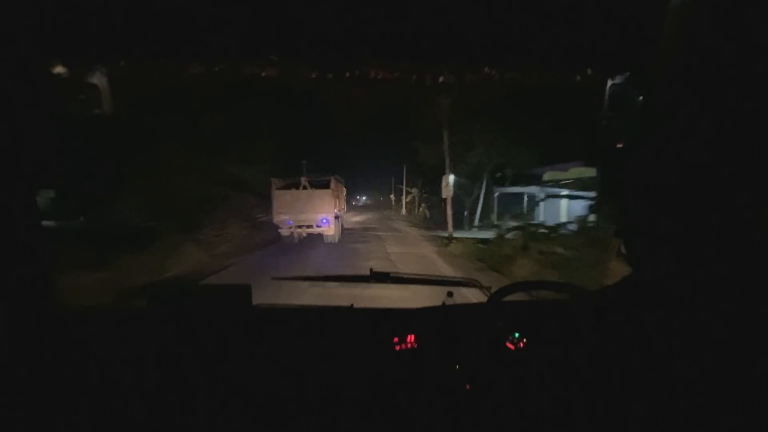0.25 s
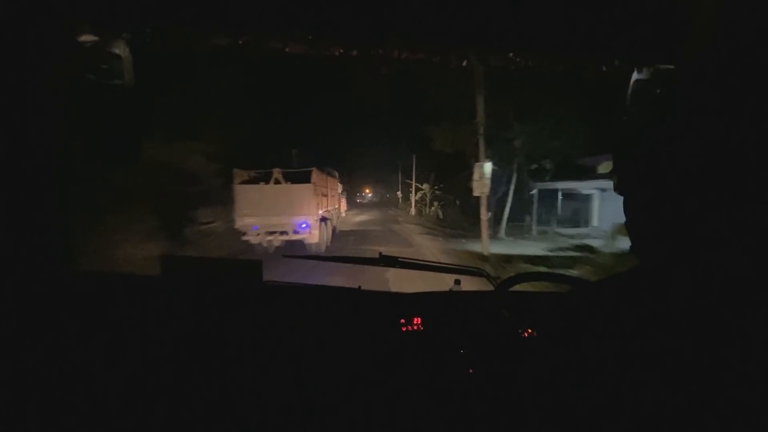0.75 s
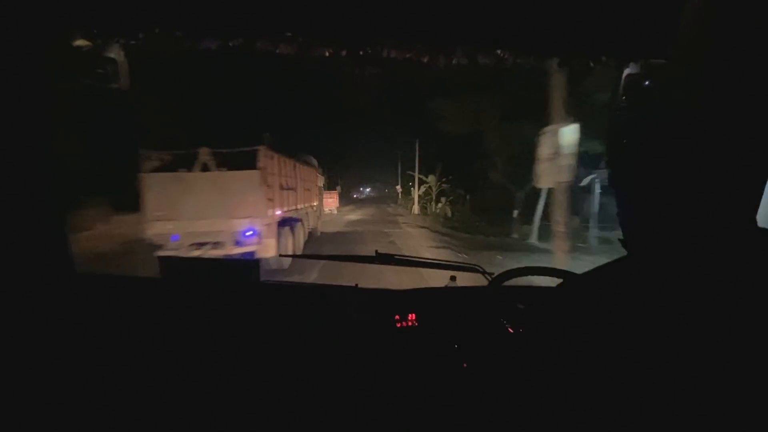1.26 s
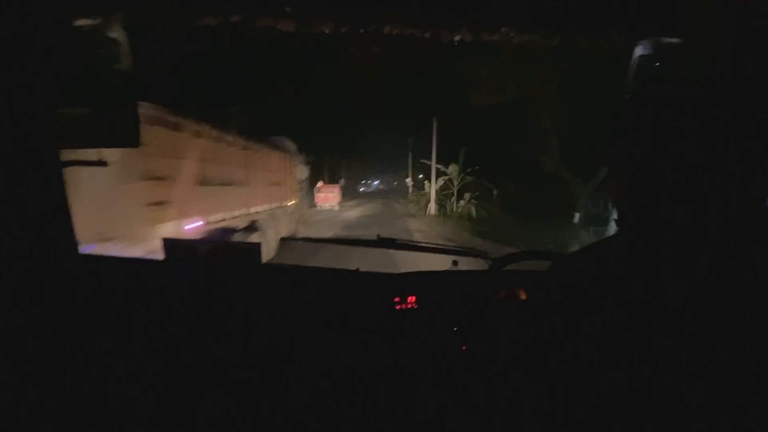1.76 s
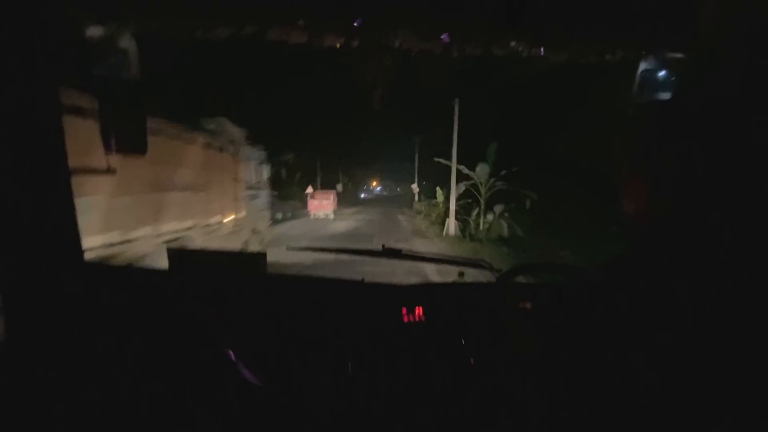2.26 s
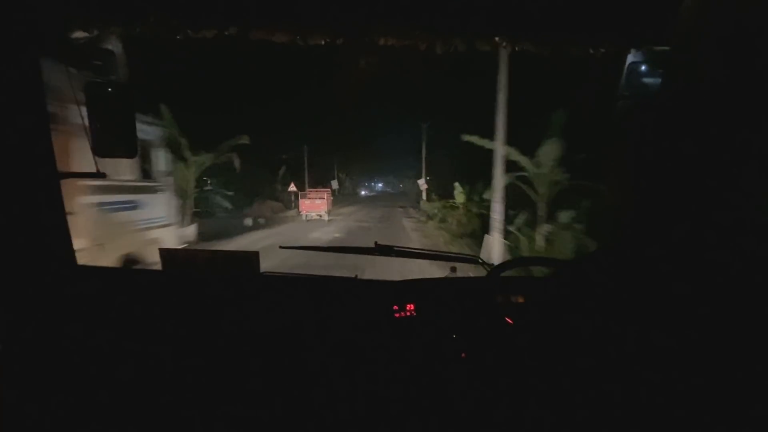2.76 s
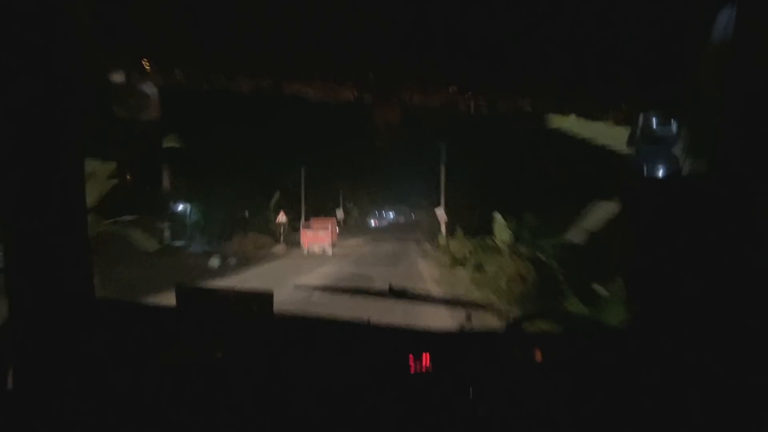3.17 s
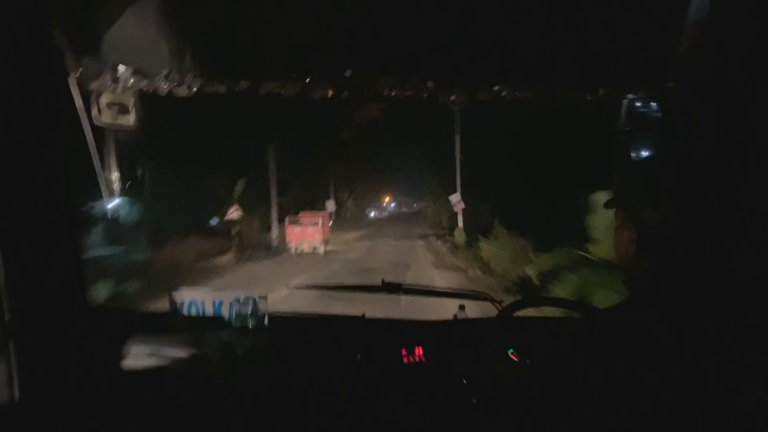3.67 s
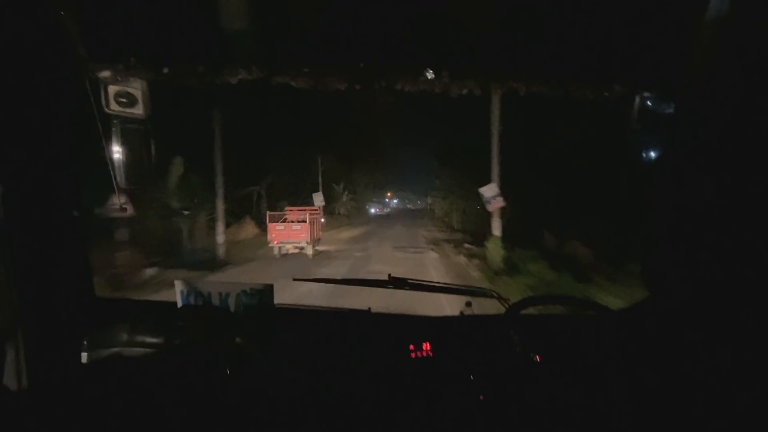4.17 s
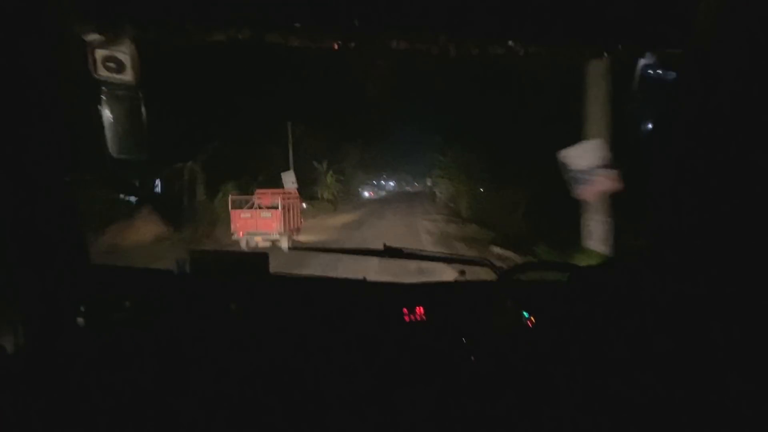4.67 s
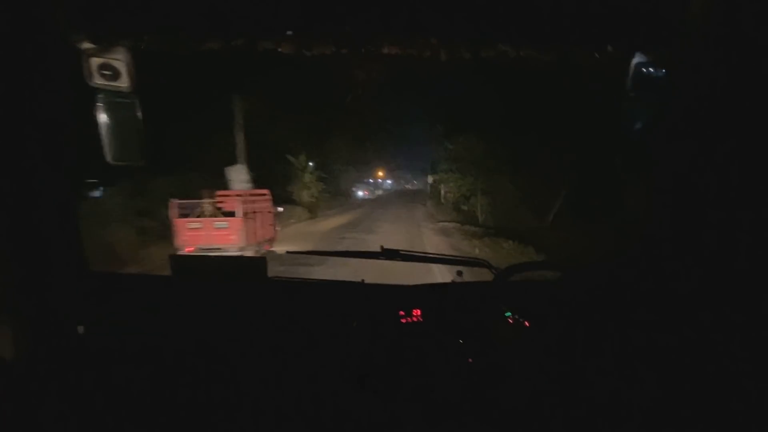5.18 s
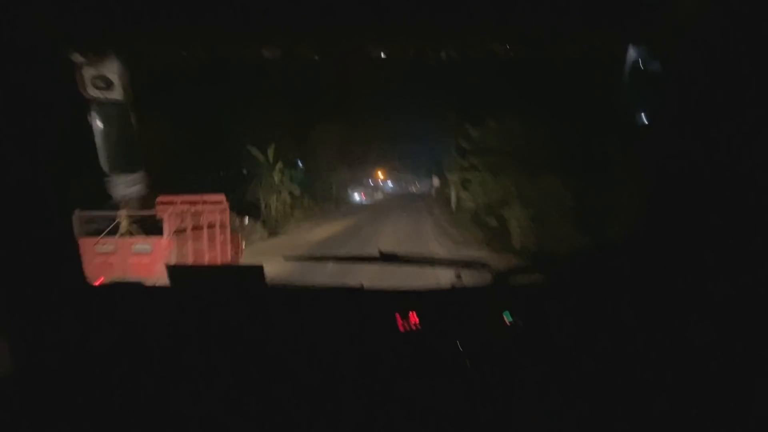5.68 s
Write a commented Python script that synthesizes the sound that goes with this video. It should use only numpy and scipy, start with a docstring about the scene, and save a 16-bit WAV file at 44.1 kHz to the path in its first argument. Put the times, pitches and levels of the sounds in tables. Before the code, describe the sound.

Interior of a bus overtaking a truck on a night road, picked up in stereo behind the windscreen. A loud, brassy air horn is sounding at the start: two trumpets, roughly 330 and 430 Hz, with bright harmonics and hissing air. It breaks off at about 0.12 s, spits back at 0.2 s with a raspy restart, and holds until about 0.87 s, its tone beating and shifting, slightly duller after 0.6 s, then ringing off quickly. A bump booms near 0.95 s, with light pane judders to 1.5 s over a quieter low rumble. From 1.5 s the road roughens: floor rumble and panel boom swell, with tyre roar, grit and fluttering trim clatter. Strong jolts and glass judder come around 2.4-2.6, 3.9-4.1, 4.8-4.9 and 5.3-5.5 s, with a heavy low bump at 4.5 s. Loose fittings knock throughout; tiny high squeaks and brief squeals appear. Rough running continues to the end.

```python
"""Air horn and rough road inside a bus

A bus overtakes a truck. Its two-trumpet air horn, two harmonic stacks over hissing air, sounds, breaks for an
instant and sounds on; the partials change level as the truck comes closer.
On rough road shaped noise gives the rumble, boom, roar and clatter; enveloped noise bursts give the knocks, thuds,
grit and juddering pane; decaying sines ring at the bumps, and unsteady sines squeak and squeal."""
import sys
import numpy as np
from scipy import signal
from scipy.fft import rfft, irfft, next_fast_len
from scipy.io import wavfile
from scipy.ndimage import uniform_filter1d

SR = 44100
rng = np.random.default_rng(int(sys.argv[2]) if len(sys.argv) > 2 else 0)


def unload_wav(signal):
    """Save mono or channel-first audio to the path in sys.argv[1] as 16-bit WAV at rate SR, clipped to [-1, 1]."""
    wavfile.write(
        sys.argv[1],
        SR,
        np.round(np.clip(np.atleast_2d(signal).T, -1, 1) * 32767).astype(np.int16),
    )


N = 261513
T = np.arange(N) / SR
EDGE_HZ = 12300  # upper band limit

# Horn valve: opening t/s, shutting t/s
VALVE = [(-.02, .118), (.199, .866)]
LOW_HZ, HIGH_HZ = 332.3, 430.2  # settled fundamentals of the trumpets
# First partials of each trumpet, fundamental first, with the beating of a Doppler-shifted echo off the truck:
# far relative level/dB, near relative level/dB, turn t/s, echo share, beat f/Hz at t = 0, beat drift/(Hz/s),
# left crest t/s, right crest t/s, left minus right level/dB
LOW_PARTIALS = [(-31.7, -25.3, 0.53, 0.47, 4.8, -5.4, 0.43, 0.41, 1.0),
                (-27.5, -30.6, 0.34, 0.34, 5.7, -6.0, 0.27, 0.21, 1.0),
                (-22.2, -31.0, 0.39, 0.65, 0.8, 4.3, 0.42, 0.41, 0.0),
                (-32.0, -27.4, 0.38, 0.23, 5.4, -0.4, 0.39, 0.41, -3.0),
                (-30.0, -34.1, 0.52, 0.32, 7.3, 0.8, 0.53, 0.53, -2.0),
                (-30.1, -41.5, 0.45, 0.8, 1.5, -1.4, 0.71, 0.75, -1.0),
                (-36.5, -40.8, 0.54, 0.44, 2.4, -2.7, 0.52, 0.4, 3.0),
                (-29.6, -37.0, 0.25, 0.63, 0.8, 0.7, 0.61, 0.58, 3.0)]
HIGH_PARTIALS = [(-33, -28.5, 0.46, 0.2, 3.1, -1.3, 0.12, 0.17, 1.0),
                 (-18.7, -26.9, 0.44, 0.23, 4.0, 5.8, 0.44, 0.36, 8.0),
                 (-32.1, -25.0, 0.36, 0.38, 3.0, 3.2, 0.1, 0.06, 2.0),
                 (-25.3, -32.3, 0.47, 0.55, 1.2, 1.8, 0.44, 0.46, 0.0),
                 (-35.5, -27.5, 0.475, 0.45, 2.2, -0.5, 0.62, 0.62, -4),
                 (-33.0, -39.7, 0.56, 0.52, 3.4, 3.5, 0.49, 0.53, -1.0),
                 (-34.5, -42, 0.41, 0.55, 2.3, -2.2, 0.5, 0.55, 0),
                 (-38, -42, 0.43, 0.36, 6.3, -2.0, 0.68, 0.63, 1.0),
                 (-45, -39.5, 0.27, 0.41, 2.2, 0.1, 0.19, 0.04, 4.0),
                 (-47.8, -44.8, 0.44, 0.47, 7.9, -4.6, 0.35, 0.28, 5.0)]
# Brassy partials above those: f/Hz, relative level/dB of each
LOW_BRASS = [(2990, -43.5), (3300, -46.5), (4300, -45), (5000, -46.5), (6200, -61), (7500, -53),
             (9000, -59), (12300, -62)]
HIGH_BRASS = [(4700, -49), (5300, -48.5), (6200, -42), (7500, -51.5), (9000, -54), (12300, -63)]
# Phase by which the left microphone leads in the horn: f/Hz, phase/rad
HORN_LEAD = [(332, 1.2), (430, 1.8), (665, -2.15), (860, .8), (997, 2.15), (1291, -1.5), (1329, .7),
             (1662, -1.9), (1721, 1.3), (1994, -1.4), (2151, .8), (2326, -1.9), (2581, -.9), (2658, 2),
             (3011, -1.3), (3442, -1.2), (3872, .1), (4302, 1.4)]
# Ringing of the horn after the valve shuts: f/Hz, t60/s
HORN_RING = [(330, .42), (430, .45), (665, .24), (860, .16), (1300, .18), (2200, .17), (3500, .14),
             (12000, .11)]
# Spectrum of air hissing through the horn: f/Hz, relative density level/dB
HORN_AIR = [(200, -11), (430, -24), (580, -13), (900, 8), (2000, 11), (3200, 6), (6000, 0), (7800, -16),
            (9000, -17), (12000, -20)]
# Reflections from passing poles and trees: f/Hz, share of the direct sound
ROADSIDE_ECHO = [(900, .08), (2200, .17), (3000, .5), (5000, .7)]
ROADSIDE_DOPPLER = .004  # spread of the relative frequency shift
TRUCK_ECHO, TRUCK_DOPPLER = .8, .0009  # for the brassy top: share of the direct sound, spread of relative shift
WAVER_SHARE, WAVER_SPREAD = .16, .016  # quick waver of each partial: share of its level, relative spread
TURN_S = 0.035  # time constant of a partial's turn from far to near level
DULL_AT_S, DULL_OVER_S, DULL_DB = 0.59, 0.019, 3  # the brassy top dulls
SURGE_DB, SURGE_S = 2.5, 0.043  # each blast starts strong, then the air pressure settles
REED_JITTER = .0014  # relative rms unsteadiness of the pitch
PUFF_DB, PUFF_S = 5, 0.03  # air spits out as the valve opens, before the reeds lock in
TONE_DB = .7  # gain of the two trumpets together
CABIN_WET_DB = -16  # gain of the cabin's tail under the horn

# Spectra of floor rumble, panel boom, roar and clatter: f/Hz, relative density level/dB
RUMBLE = [(12, -29), (25, 4), (31, 8), (42, 13.5), (52, 18), (59, 24), (73, 16), (90, 20), (115, 5),
          (170, -59)]
BOOM = [(70, -72), (118, 0), (148, -8), (164, -4), (177, 1.5), (193, -5.5), (216, -3), (245, -11.5),
        (300, -12), (400, -18.5), (600, -25), (1200, -120)]
ROAR = [(150, -0.5), (330, 4), (500, -1.5), (800, -2.5), (1200, -9.5), (1700, -15), (2400, -22),
        (3400, -22), (5000, -24), (9000, -74)]
CLATTER = [(900, -13), (2400, 12.5), (4000, 0.5), (6500, 6), (8500, 2), (9600, -2), (11000, -0.5),
           (12400, -15)]
# Steady running on smooth, then rough road: t/s, floor rumble relative level/dB, roar relative level/dB
ROAD = [(0, -28, -35.5), (1.1, -35, -54), (1.39, -31.5, -55), (1.47, -22.5, -44), (1.8, -24.5, -44.5),
        (2.15, -22.5, -38.5), (3.0, -21.5, -44), (4.5, -19, -40), (5.13, -18.5, -44), (5.93, -16, -39)]
# Boom of the body panels: t/s, level/dB before the brief changes
BOOM_LEVEL = [(0, -35.5), (.55, -39.5), (.9, -39.5), (1.0, -30), (1.38, -35), (1.5, -23.5), (1.68, -28),
              (1.88, -20), (2.5, -23.5), (2.8, -21.5), (3.04, -29), (3.12, -24.5), (3.6, -20.5), (3.8, -26),
              (4.4, -21), (5.2, -22.5), (5.52, -19), (5.93, -22.5)]
# Brief changes of level, up or down: middle t/s, floor change/dB, panel boom change/dB
BRIEF_CHANGES = [(1.68, 3.5, -4.5), (2.52, 2.5, -4), (2.66, -3, -4.5), (3.04, -4.5, -3.5), (3.25, 1.5, -4),
                 (3.74, -3.5, -2.5), (4.33, -10, 3), (4.58, -2, -6.5), (5.77, -5.5, -1)]
CHANGE_S = 0.034  # half the 1/e length of a brief change
# Floor heaves as the wheels cross broken tarmac: middle t/s, 1/e length/s, relative level/dB
HEAVES = [(0.27, 0.06, -22), (1.5, 0.15, -22.5), (1.933, 0.033, -15), (2.16, 0.053, -16.5),
          (2.35, 0.058, -14), (2.448, 0.14, -17), (2.616, 0.036, -12), (3.143, 0.022, -13.5),
          (3.21, 0.034, -11), (3.58, 0.08, -17.5), (3.81, 0.054, -15), (3.886, 0.052, -14),
          (4.096, 0.31, -19.5), (4.541, 0.04, -15), (4.631, 0.034, -17), (4.815, 0.14, -16),
          (5.007, 0.066, -19), (5.23, 0.12, -15.5), (5.376, 0.043, -13.5), (5.508, 0.042, -12.5),
          (5.568, 0.053, -18), (5.675, 0.026, -22), (5.857, 0.069, -24)]
HEAVE_EDGE = 4  # steepness of a heave's flanks
# Rough stretches that shake the bus: t/s, length/s, roar relative level/dB, clatter relative level/dB
STRETCHES = [(0.84, 0.024, -34.5, -55), (1.435, 0.13, -42, -57), (1.836, 0.17, -37, -53),
             (2.341, 0.23, -34, -50.5), (2.431, 0.032, -26.5, -47), (2.682, 0.15, -39.5, -53.5),
             (3.035, 0.19, -39, -53), (3.295, 0.21, -36, -50.5), (3.763, 0.44, -35.5, -52.5),
             (3.855, 0.095, -30, -48), (4.267, 0.12, -34, -48), (4.642, 0.17, -38, -55),
             (4.772, 0.16, -30.5, -47.5), (5.158, 0.18, -33.5, -54), (5.28, 0.37, -32.5, -50),
             (5.788, 0.077, -32, -45.5)]
SHAKE_RISE_S, SHAKE_T60 = 0.052, 0.56  # shaking builds on a stretch and dies away after it
# in steady running the trim clatters under the roar and grows faster than it
CLATTER_UNDER_DB, CLATTER_GROWTH, ROAR_NORMAL_DB = -19, 1.13, -46
# Wheels hit bumps and a panel rings: t/s, relative level/dB, ring f/Hz, t60/s
BUMPS = [(0.948, -6, 171.5, 0.1), (4.473, -2, 162.4, 0.12), (5.496, -8.5, 147, 0.14),
         (5.6, -9.5, 179.7, 0.44)]
BUMP_SIDE_DB = 2  # left minus right
# Jolts through the bodywork: t/s, relative level/dB, t60/s
THUDS = [(1.49, -37, 0.17), (2.31, -28, 0.35), (2.458, -17, 0.11), (2.555, -22, 0.09), (3.11, -23, .15),
         (3.29, -27.5, 0.43), (3.57, -22, 0.12), (3.89, -21, 0.13), (4.01, -18, 0.16), (4.105, -22, 0.22),
         (4.325, -24, 0.36), (4.74, -31, .3), (4.91, -29, 0.17), (5.177, -29, 0.13), (5.38, -22, 0.21),
         (5.78, -21.5, 0.29)]
# Spectrum of the thuds: f/Hz, relative density level/dB
THUD_COLOUR = [(100, -25), (220, 7), (330, 11.5), (500, 4.5), (800, -26), (1300, -12), (3000, -43)]
# Spectrum of grit thrown up by the tyres: f/Hz, relative density level/dB
GRIT = [(250, 3.5), (480, 0), (640, 2.5), (850, 1), (1300, -6.5), (2500, -15.5), (5000, -32)]
# Knocks of loose fittings: t/s, relative level/dB, t60/s
RATTLES = [(1.0171, -46, 0.073), (2.1794, -37, 0.11), (2.2184, -32, 0.11), (2.3206, -40, 0.08),
           (2.373, -23.5, 0.11), (2.4294, -28, 0.11), (2.6534, -31, 0.097), (2.8938, -39, 0.33),
           (3.05, -34, 0.056), (3.1682, -25, 0.066), (3.2116, -33.5, 0.12), (3.2896, -31.5, 0.091),
           (3.4411, -45, 0.1), (3.597, -34.5, 0.16), (3.6381, -38.5, 0.46), (3.7864, -34, 0.16),
           (3.8372, -27, 0.068), (3.8864, -30.5, 0.14), (4.1091, -34, 0.073), (4.1869, -35, 0.13),
           (4.2817, -35, 0.069), (4.363, -23, 0.033), (4.6009, -33.5, 0.17), (4.6245, -25.5, 0.07),
           (4.6753, -35, 0.23), (4.791, -29, 0.073), (4.9244, -26.5, 0.08), (5.2969, -33.5, 0.2),
           (5.5732, -30, 0.076), (5.6979, -29.5, 0.12), (5.768, -29, 0.19)]
# Spectrum of knocks and ticks: f/Hz, relative density level/dB
RATTLE_COLOUR = [(300, -19), (1200, 3), (2600, 7.5), (5000, 9), (7500, 9.5), (9500, 6.5), (11000, 7.5),
                 (12400, 3.5)]
# Judders of a window pane in its frame: t/s, relative level/dB
JUDDERS = [(1.035, -40), (1.128, -36), (1.199, -33.5), (1.395, -31), (1.49, -30), (2.449, -15),
           (2.503, -17.5), (2.556, -24), (2.597, -20), (3.226, -23.5), (3.568, -32), (3.893, -15.5),
           (3.944, -23.5), (3.985, -34), (4.012, -27), (4.118, -19.5), (4.341, -21), (4.856, -15),
           (4.923, -18.5), (5.177, -21), (5.317, -14), (5.375, -10.5), (5.43, -30), (5.465, -25.5),
           (5.51, -19), (5.618, -15)]
# Resonances of the pane: f/Hz, width/Hz, relative level/dB
PANE = [(720, 84, 12), (1026, 8, 22.5), (1490, 120, -22), (1940, 65, 1), (2500, 290, -1), (3430, 520, -4)]
# Squeaks of a dry joint: middle t/s, nominal length/s, mean f/Hz, level/dB
SQUEAKS = [(1.92, 0.035, 10430, -60), (1.986, 0.042, 10730, -52), (2.14, 0.025, 10800, -53),
           (2.48, 0.094, 8830, -55), (2.761, 0.033, 10730, -50.5), (3.097, 0.046, 10690, -43.5),
           (4.037, 0.046, 11800, -53), (4.09, 0.022, 8830, -54), (4.42, 0.07, 9900, -55),
           (5.42, .04, 8800, -52), (5.604, .1, 10000, -57), (5.854, 0.041, 10560, -57)]
# Squeals of the rubbing window frame on jolts: middle t/s, nominal length/s, mean f/Hz, level/dB
SQUEALS = [(2.475, .03, 1930, -41), (2.497, .075, 2300, -45.5), (4.865, 0.033, 2300, -48),
           (5.315, 0.035, 2310, -48), (5.385, 0.036, 2290, -46)]
SQUEAL_WAVER = 0.01  # relative rms unsteadiness of pitch

# Likeness of the microphone pair: f/Hz, left-right correlation
LIKENESS = [(60, .96), (190, .92), (320, .48), (550, .4), (750, -.1), (1800, -.25), (3600, 0), (9500, 0),
            (11000, .5)]
# Balance of the microphone pair: f/Hz, left minus right level/dB
TILT = [(60, 1.6), (200, 2.2), (400, 3.3), (1200, 1.7), (2200, -.5), (5000, 3), (9000, -1), (12000, 0)]


def horn(air_db=-32.5, air_fall_db=5):
    """Superposition: two trumpets a little under a fourth apart sound over their own escaping air."""
    puff_db = sum(PUFF_DB * np.exp(-((T - opens - .02) / PUFF_S) ** 2) for opens, shuts in VALVE)
    out = noise(HORN_AIR) * amp(air_db - air_fall_db * T + puff_db) * valve(T, 2100)
    low = trumpet(LOW_HZ, LOW_PARTIALS, LOW_BRASS)
    high = trumpet(HIGH_HZ, HIGH_PARTIALS, HIGH_BRASS)
    add(out, 0, amp(TONE_DB) * (low + high))
    return out


def trumpet(pitch_hz, partials, brass, rasp=0.0123, sharp=0.0048):
    """Harmonic series: a reed drives a stack of partials, which beat with their Doppler-shifted echoes."""
    t = T[T < 1.15]
    # the reed runs slightly sharp at low pressure and rasps as it restarts
    sharpened = 1 + sharp * np.exp(-((t - .18) / 0.05) ** 2)
    unsteady = REED_JITTER + rasp * np.exp(-((t - .215) / 0.0212) ** 2)
    hz = pitch_hz * (sharpened + unsteady * wander(140)[:len(t)])
    angle = 2 * np.pi * np.cumsum(hz) / SR
    dulled = .5 + .5 * np.tanh((t - DULL_AT_S) / DULL_OVER_S)
    out = np.zeros((2, len(t)))
    for k in range(1, int(EDGE_HZ / pitch_hz) + 1):
        partial_hz = k * pitch_hz
        if k <= len(partials):
            far_db, near_db, turn_s, share, beat_hz, drift, left_s, right_s, side_db = partials[k - 1]
            near = .5 + .5 * np.tanh((t - turn_s) / TURN_S)
            gain = amp(far_db) * (1 - near) + amp(near_db) * near
            # beat phase in cycles, zero at the crest on each side
            crest = np.array([[left_s], [right_s]])
            beats = (beat_hz + drift * (t + crest) / 2) * (t - crest)
            truck = (1 + share * np.exp(2j * np.pi * beats)) / np.hypot(1, share)
        else:
            side_db = 0
            gain = amp(read(brass, partial_hz) - DULL_DB * dulled)
            truck = fading(t, partial_hz, TRUCK_ECHO, TRUCK_DOPPLER)
        roadside = fading(t, partial_hz, read(ROADSIDE_ECHO, partial_hz), ROADSIDE_DOPPLER)
        waver = fading(t, partial_hz, WAVER_SHARE, WAVER_SPREAD)
        left = amp(side_db) * np.exp(1j * read(HORN_LEAD, partial_hz))
        sides = np.array([[left], [1]]) * 2 / np.hypot(1, amp(side_db))
        carrier = np.exp(1j * (k * angle + 2 * np.pi * rng.random()))
        tone = sides * truck * roadside * waver * carrier
        out += gain * valve(t, partial_hz) * tone.real
    return out


def valve(t, hz, rise=0.006):
    """Transient response: pressure builds, settles and rings away, the bass slowest both ways."""
    slowness, out = (hz / 1000) ** -.33, 0
    for opens, shuts in VALVE:
        age = np.maximum(t - opens, 0)
        surge_db = SURGE_DB * np.exp(-age / SURGE_S)
        ring_db = -60 * np.maximum(t - shuts, 0) / read(HORN_RING, hz)
        out = out + amp(surge_db + ring_db) * (1 - np.exp(-age / (rise * slowness))) ** 2
    return out


def fading(t, hz, depth, doppler):
    """Multipath interference: direct sound plus four Doppler-shifted reflections, a complex gain per side."""
    coarse_t = t[::32]
    shift_hz = rng.normal(0, doppler * hz, (2, 4, 1))
    echoes = np.exp(2j * np.pi * (shift_hz * coarse_t + rng.random((2, 4, 1)))).sum(1) / 2
    return np.array([np.interp(t, coarse_t, 1 + depth * e) for e in echoes]) / np.hypot(1, depth)


def saloon(x, t60=0.12):
    """Reverberation: the long passenger space adds a short, diffuse, dull tail."""
    t = T[:SR // 2]
    tail = rng.standard_normal((2, len(t))) * amp(-60 * t / t60) * (t > .006)
    tail = signal.lfilter(*signal.butter(1, 4000, fs=SR), tail / np.linalg.norm(tail[0]))
    return x + amp(CABIN_WET_DB) * signal.fftconvolve(x, tail, axes=1)[:, :N]


def bumps():
    """Damped free oscillation: each bump sets a panel swinging at its own frequency."""
    out, t = np.zeros((2, N)), T[:SR // 2]
    side_db = np.array([[.5], [-.5]]) * BUMP_SIDE_DB
    for s, db, hz, t60 in BUMPS:
        envelope = amp(side_db + db - 60 * t / t60) * (1 - np.exp(-t / 0.018))
        add(out, s, envelope * np.sin(2 * np.pi * hz * t))
    return out


def thuds():
    """Impulsive excitation: the bodywork takes each jolt with a dull, hollow noise burst."""
    return steadied(noise(THUD_COLOUR), 0.052) * strikes(THUDS, 0.0053)


def rattles(level_db=-7, chatter_db=3):
    """Repeated impact: each knock is a short noise burst whose level chatters."""
    return noise(RATTLE_COLOUR) * strikes(RATTLES, 0.0029) * amp(level_db + chatter_db * wander(230))


def pane(level_db=-11, t60=0.11, chatter_db=3):
    """Resonance: chattering against its frame, the glass rings in a few bands, narrow and broad."""
    hz = np.geomspace(100, EDGE_HZ, 400)
    power = sum(amp(db) ** 2 / (1 + (2 * (hz - f) / width) ** 2) for f, width, db in PANE)
    colour = np.transpose([hz, 10 * np.log10(power)])
    blows = strikes([(s, db, t60) for s, db in JUDDERS], 0.0029)
    return noise(colour) * blows * amp(level_db + chatter_db * wander(120))


def squeaks(waver=0.0044):
    """Friction-induced vibration: high squeaks of a dry joint and lower squeals of the window frame."""
    return stick_slip(SQUEAKS, waver) + stick_slip(SQUEALS, SQUEAL_WAVER)


def stick_slip(rows, waver):
    """Stick-slip: rubbing surfaces give thin tones of unsteady frequency."""
    out, drift = np.zeros((2, N)), wander(200)
    for s, length, hz, db in rows:
        during = abs(T - s) < length * .7  # includes the tapered ends
        angle = 2 * np.pi * np.cumsum(hz * (1 + waver * drift[during])) / SR
        envelope = np.sqrt(2) * amp(db) * signal.windows.tukey(len(angle), .7)
        out[:, during] += envelope * np.sin(angle + rng.normal(0, 0.42, (2, 1)))
    return out


def grit(roar):
    """Random impacts: grit strikes the underside in short dull bursts, harder as the tyres roar more."""
    return noise(GRIT) * random_hits(roar, per_s=110, spread_db=0.2, t60=0.048)


def ticks(clatter, level_db=-2):
    """Random impacts: small parts tick, harder as the cabin shakes more."""
    return noise(RATTLE_COLOUR) * random_hits(clatter + level_db, per_s=45, spread_db=7.5, t60=0.016)


def cabin(rumble, rumble_db=0.8):
    """Structure-borne sound: the road shakes the floor and the body panels boom."""
    boom, = curves(BOOM_LEVEL)
    floor_change, boom_change = sum(np.outer(changes_db, np.exp(-((T - s) / CHANGE_S) ** 2))
                                    for s, *changes_db in BRIEF_CHANGES)
    floor = steadied(noise(RUMBLE), 0.088) * amp(rumble + floor_change + rumble_db)
    panels = steadied(noise(BOOM), 0.17) * amp(boom + boom_change)
    return floor + panels


def rush(roar, clatter, roar_db=3.5, clatter_db=5, roar_flutter_db=1.13, clatter_flutter_db=2):
    """Amplitude modulation: air and tyres roar in gusts; a fine clatter of trim flutters with them."""
    flutter = wander(27)
    trim_flutter = 1.02 * flutter + 0.91 * wander(160)
    air_and_tyres = noise(ROAR) * amp(roar + roar_db + roar_flutter_db * flutter)
    trim = noise(CLATTER) * amp(clatter + clatter_db + clatter_flutter_db * trim_flutter)
    return air_and_tyres + trim


def shaking():
    """Addition of powers: levels in dB of rumble, roar and clatter from running, heaves and rough stretches."""
    rumble, roar = curves(ROAD)
    clatter = ROAR_NORMAL_DB + CLATTER_UNDER_DB + CLATTER_GROWTH * (roar - ROAR_NORMAL_DB)
    power = amp([rumble, roar, clatter]) ** 2
    for s, length, db in HEAVES:
        power[0] += (amp(db) * np.exp(-abs(2 * (T - s) / length) ** HEAVE_EDGE)) ** 2
    t = T[:SR]
    for s, length, *levels_db in STRETCHES:
        envelope = (1 - np.exp(-t / SHAKE_RISE_S)) * amp(-60 * np.maximum(t - length, 0) / SHAKE_T60)
        add(power[1:], s, (amp(levels_db)[:, None] * envelope) ** 2)
    return 10 * np.log10(power)


def strikes(rows, attack):
    """Exponential decay: the summed envelope of a row of blows (t/s, level/dB, t60/s)."""
    strength, t = np.zeros((1, N)), T[:SR // 3]
    for s, db, t60 in rows:
        add(strength, s - attack, amp(db - 60 * t / max(t60, .01)) * (1 - np.exp(-t / attack)))
    return strength


def random_hits(level, per_s, spread_db, t60):
    """Poisson-like process: the envelope of decaying hits at random instants and of random strength."""
    extra_db = spread_db * np.minimum(rng.exponential(1, N), 3)
    size = amp(level + extra_db) * (rng.random(N) < per_s / SR)
    return signal.oaconvolve(size, amp(-60 * T[:SR // 8] / t60))[:N]


def noise(colour):
    """Partial coherence: coloured noise of rms 1 as two microphones hear it in the cabin."""
    size = next_fast_len(N, True)
    hz = np.fft.rfftfreq(size, 1 / SR)
    left, other = rfft(rng.standard_normal((2, size)))
    same = np.clip(read(LIKENESS, hz), -1, 1)
    right = (same * left + np.sqrt(1 - same ** 2) * other) / amp(read(TILT, hz))
    return unit(irfft(np.array([left, right]) * amp(read(colour, hz)), size)[:, :N])


def steadied(x, span):
    """Envelope normalisation: evens out the slow swells of a narrow noise and keeps its quick throb."""
    return x / np.sqrt(uniform_filter1d((x ** 2).mean(0), max(int(span * SR), 9)) + 1e-9)


def wander(rate):
    """Low-pass random process: smooth fluctuation of rms 1, with a Gaussian roll-off at rate Hz."""
    coarse = rng.standard_normal(8192)  # one value a millisecond
    hz = np.fft.rfftfreq(8192, 1e-3)
    smooth = unit(irfft(rfft(coarse) * np.exp(-(hz / rate) ** 2)))
    return np.interp(T, np.arange(8192) * 1e-3, smooth)


def amp(db):
    """Logarithmic level: decibels to gain."""
    return 10 ** (np.asarray(db) / 20)


def unit(x):
    """Normalisation: scales to rms 1."""
    return x / np.sqrt(np.mean(x ** 2) + 1e-20)


def read(points, hz):
    """Interpolation: a spectrum table read on a log-frequency axis."""
    f, value = np.transpose(points)
    return np.interp(np.log(hz + 1), np.log(f + 1), value)


def curves(rows):
    """Interpolation: every column of a time table, sample by sample."""
    s, *columns = np.transpose(rows)
    return [np.interp(T, s, c) for c in columns]


def add(mix, s, sound):
    """Superposition: mixes a sound in at time s."""
    part = mix[:, max(round(s * SR), 0):][:, :sound.shape[-1]]
    part += sound[..., :part.shape[-1]]


def scene():
    """Superposition: all sources as heard behind the windscreen."""
    rumble, roar, clatter = shaking()
    impacts = bumps() + thuds() + rattles() + pane() + grit(roar) + ticks(clatter)
    return saloon(horn()) + impacts + squeaks() + cabin(rumble) + rush(roar, clatter)


def record(dry):
    """Band limitation: a low-pass filter removes what lies above the band edge."""
    low_pass = signal.firwin(301, EDGE_HZ, window=("kaiser", 7), fs=SR)
    return signal.oaconvolve(dry, low_pass[None], "same")


dry = scene()
out = record(dry)
unload_wav(out)
```